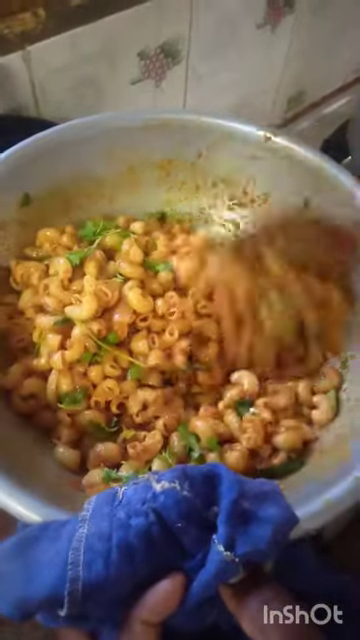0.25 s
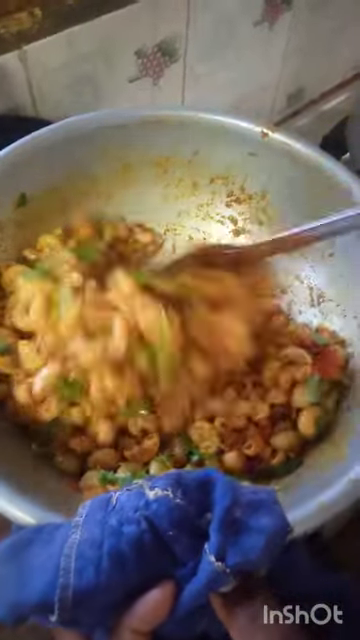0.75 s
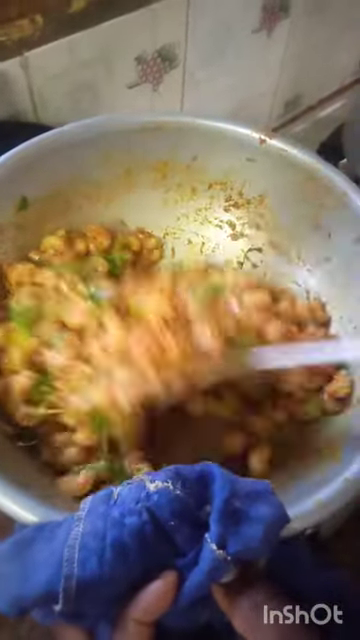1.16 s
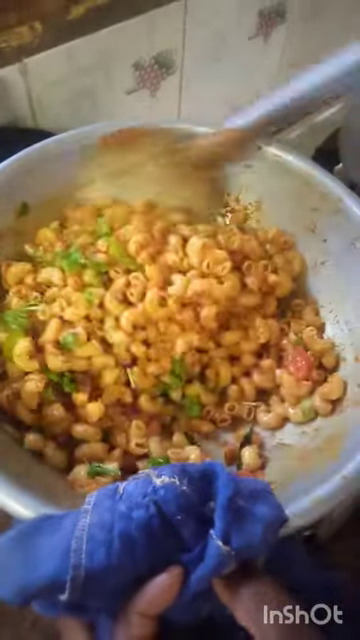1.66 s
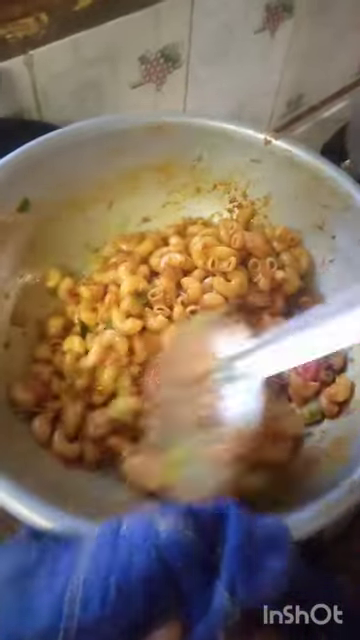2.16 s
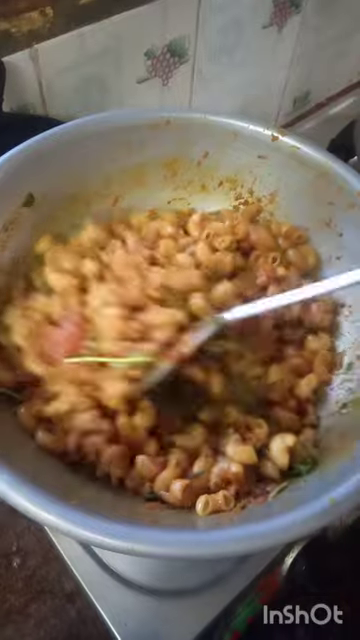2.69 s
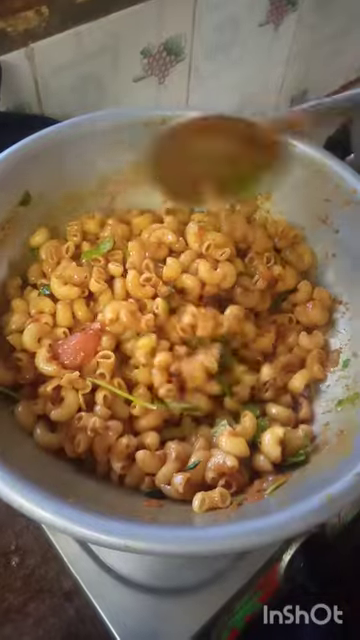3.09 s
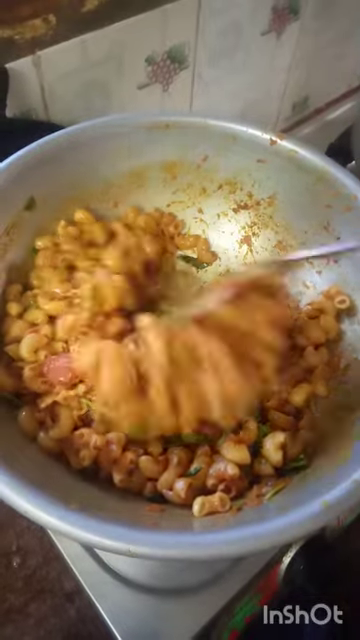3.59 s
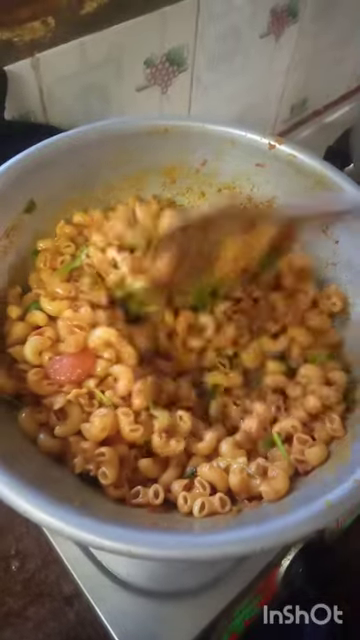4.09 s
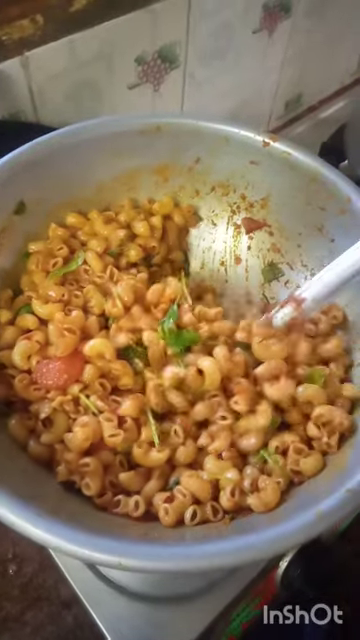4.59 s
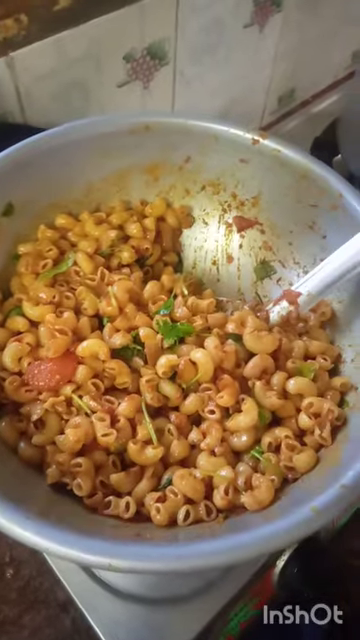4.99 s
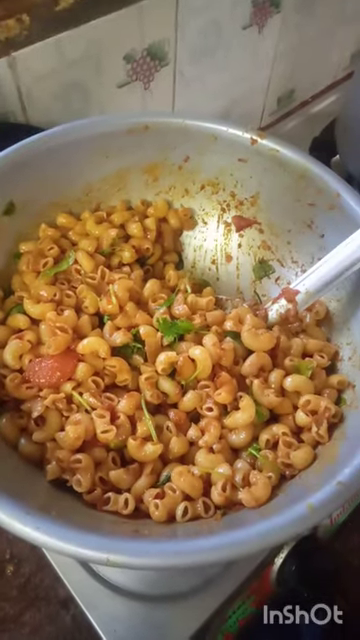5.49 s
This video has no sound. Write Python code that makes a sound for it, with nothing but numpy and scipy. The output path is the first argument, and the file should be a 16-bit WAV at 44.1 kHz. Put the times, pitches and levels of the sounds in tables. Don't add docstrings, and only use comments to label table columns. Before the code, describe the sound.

Close, mono phone pickup in a small kitchen: a spoon clangs twice against a thin pot, rasps through moist pasta and scoops down to bare metal with a sinking groan. Small ticks, snaps and low thuds fill the middle. A sharp slap, a sustained ring and a bright tap come later, then mostly quiet hiss, with faint whistles far outside.

```python
import sys
import numpy as np
from scipy import signal
from scipy.fft import rfft, irfft, next_fast_len
from scipy.io import wavfile
from scipy.ndimage import uniform_filter1d, minimum_filter1d

SR = 44100
rng = np.random.default_rng(int(sys.argv[2]) if len(sys.argv) > 2 else 0)


def invert_db(level):
    return 10 ** (np.asarray(level, dtype=float) / 20)


def file_out(sig):
    cols = np.atleast_2d(sig).T
    lim = np.clip(cols, -1, 1)
    pcm = np.round(lim * 32767).astype(np.int16)
    wavfile.write(sys.argv[1], SR, pcm)


N = 253479

# (frequency [Hz], t60 [s])
POT_MODES = [(226, 0.36), (322, 0.55), (436, 0.28), (464, 0.3), (556, 0.3), (694, 0.52), (830, 0.18),
             (950, 0.075), (1184, 0.6), (1292, 0.18), (1566, 0.55), (1725, 0.45), (2070, 0.32),
             (2150, 0.14), (2568, 0.4), (2614, 0.14), (2660, 0.15), (2985, 0.17), (3047, 0.22),
             (3311, 0.16), (3568, 0.17), (3595, 0.12), (3811, 0.13), (4042, 0.2), (4242, 0.22), (4455, 0.2),
             (5210, 0.12), (5445, 0.12)]
# (time [s], crash level [dB], brightness [dB per octave], crash t60 [factor])
KNOCKS = [
    (.0575, -26.5, -3.5, 2.8),
    (.479, -15, -0.4, 0.85),
    (1.6305, -37, 1.5, 0.85),
    (3.1025, -20.5, 2, 2.15),
    (4.287, -27.5, 0, 2.2),
    (4.628, -36.5, 6, 2.7),
]
# (level [dB] at each of the six knocks, which land on different places)
KNOCK_PLACES = [(-32, -28.5, -44.5, -28.5, -32, -34.5), (-34, -37, -70, -35.5, -44, -43),
                (-27.5, -58, -68, -39, -65, -58), (-31.5, -32, -55.5, -34.5, -68, -47),
                (-31, -32.5, -56, -57, -65, -51), (-31.5, -33.5, -51.5, -31.5, -33.5, -58),
                (-26.5, -33, -47, -40, -39, -52), (-11.5, -42, -31.5, -32, -51, -53),
                (-28, -61, -55, -38.5, -24, -45), (-28.5, -63, -39.5, -53, -30, -55),
                (-41, -28.5, -55, -45, -34, -45), (-32, -52, -57, -34.5, -38, -53),
                (-21.5, -21.5, -31, -26, -36, -35), (-49.5, -25, -40, -31, -27, -28),
                (-28.5, -22.5, -40, -37, -23, -30.5), (-23.5, -10.5, -46, -41, -26, -31),
                (-45.5, -50, -41, -41, -39, -24), (-17, -9, -27, -21, -6, -22.5),
                (-56.5, -51, -49, -50, -39, -35), (-26.5, -15.5, -35, -28, -16, -27),
                (-30.5, -17, -27, -48, -17.5, -39), (-59.5, -37, -51, -25, -27, -19.5),
                (-30, -13, -33, -34, -14, -31), (-29.5, -22, -39, -45, -24, -40),
                (-51, -23.5, -50, -51, -32, -46), (-37, -28, -52, -53, -32.5, -42),
                (-63, -28, -44, -31, -60, -33), (-34, -22, -44, -38, -34, -43)]
KNOCK_DAMPING = [1.02, 1.67, 0.93, 0.79, 0.93, 1.57]
KNOCK_DAMPING_TILT = [0.0, 0.0063, 0, 0.12, 0.09, 0.058]
KNOCK_RINGS_FOR = [.4, .4, .4, .4, .27, .3]
# (frequency [Hz], level [dB per Hz])
CRASH_SPECTRUM = [(70, -27.5), (120, -24), (250, -1), (700, -3.5), (1400, -4.5), (2200, 0), (3500, -19),
                  (4500, -12.5), (6200, -9.5), (8000, -4.5), (9800, -19), (11500, -19), (14500, -21),
                  (16400, -6.5)]
# (frequency [Hz], t60 [s])
CRASH_T60 = [(150, 0.21), (600, 0.17), (2000, 0.13), (5000, 0.14), (8000, 0.2), (15000, 0.085)]
# (time [s], peak level [dB], centre [Hz], t60 [s])
CRACKS = [
    (.4808, -8, 7900, .016),
    (.4812, -7, 2700, .03),
    (3.1035, -14, 5250, .03),
    (3.1215, -15, 750, .025),
    (3.132, -14, 850, .03),
    (.2172, -33, 11000, .03),
    (2.5105, -43, 2300, .08),
    (4.0275, -37, 500, .08),
    (4.5055, -28, 2200, .04),
]
# (start [s], length [s], pressure [dB], depth in the pasta [dB], grit [dB])
STROKES = [(0.074, 0.16, -36.5, -5, 5), (0.496, 0.082, -27.5, -5, 0), (0.706, 0.042, -42.5, -7, -6),
           (0.857, 0.12, -50, -15, -8), (0.991, 0.35, -42.5, -4.5, -16), (1.136, 0.12, -33, -5.5, 3.5),
           (1.364, 0.11, -50.5, -13, 1.5), (1.645, 0.056, -32, -17.5, -0.5), (1.737, 0.21, -38, -2, 1),
           (1.945, 0.14, -38, -3, -1), (2.027, 0.023, -32.5, -28, -6), (2.217, 0.032, -45.5, 1.5, -29),
           (2.31, .15, -58, -23, 1), (2.503, 0.098, -46, -10.5, -9), (2.575, 0.11, -45, -6.5, -3.5),
           (2.672, 0.27, -49, -13.5, -1.5), (3.101, 0.071, -32, 2.5, 5), (3.227, 0.13, -37.5, -10, -11),
           (3.421, 0.12, -47.5, 8, -9), (3.916, 0.16, -45, -25, -4), (4.022, 0.028, -48, 5, -12),
           (4.093, 0.049, -46.5, 1, -5), (4.502, 0.058, -32.5, 1, -6.5), (4.629, 0.1, -37, 0, -3)]
# (frequency [Hz], level [dB per Hz])
RASP_SPECTRUM = [(47, -57), (80, -10.5), (249, 12.5), (465, -3.5), (759, 0.5), (1420, -7.5), (2110, -7.5),
                 (2310, -11), (3020, -6.5), (4710, -25.5), (5900, -27), (7700, -20), (11500, -42.5),
                 (14700, -35), (16400, -44.5)]
SLIDING_DB = [-14, -13, -12, -11, -12, -12, -10, -10, -17, -18, -17, -16, -10, -12, -8, -8, -8, 1, -10, -9,
              -7, -8, -8, -8, -14, -14, -22, -24]
# (time [s], level [dB], frequency [Hz])
SCOOP = [
    (1.14, -29, 830),
    (1.156, -28.5, 754),
    (1.185, -27, 597),
    (1.205, -29.5, 514),
    (1.245, -32, 490),
    (1.278, -33, 420),
    (1.346, -43.5, 430),
    (1.42, -65, 440),
]
# (frequency [Hz], width [Hz], level [dB])
SCOOP_RINGS = [(311.3, 8.2, 3.5), (459, 26, -1), (528, 19, -4.5), (585, 20, -13), (668, 32, -11.5),
               (800, 33, -8.5), (870, 25, -18), (1010, 21, -23)]
# (time [s], level [dB], frequency [Hz])
GRIT_SQUEAL = [
    (0.58, -47, 2480),
    (0.61, -31.5, 2500),
    (0.654, -29, 2170),
    (0.68, -37, 2140),
    (0.76, -60, 2290),
]
# (time
# [s], peak level [dB], frequency [Hz], t60 [s], rise [s])
PINGS = [(0.0582, -8, 889, 0.051, 0.00098), (.0605, -11, 734, 0.028, .002),
         (0.2153, -18.5, 8280, 0.026, 0.0025), (.229, -35, 8150, .04, .003), (.238, -34, 8300, .06, .003),
         (1.14, -29, 885, .1, 0.0016), (1.153, -27.5, 644, 0.17, 0.0033), (1.157, -27, 963, 0.086, 0.0031),
         (1.18, -26, 694, .07, 0.0024), (1.193, -22, 554, 0.069, 0.005),
         (1.201, -17.5, 464.6, 0.15, 0.0068), (1.226, -25, 627, 0.051, .003),
         (1.235, -25, 472, 0.14, 0.0033), (1.246, -26.5, 322.3, 0.47, 0.0058),
         (1.256, -19, 490, 0.056, 0.0043), (1.25, -27, 674, 0.13, 0.0036), (1.265, -33, 765, 0.17, 0.0066),
         (1.28, -26, 560, .12, 0.0034), (1.195, -37, 1534, 0.091, 0.0066), (1.305, -32, 222, 0.11, .01),
         (1.385, -39, 319, 0.22, 0.011), (1.631, -32, 5210, .04, .001), (1.646, -24, 964, 0.057, 0.0021),
         (1.662, -38, 5370, .06, .003), (1.68, -36, 5420, .08, .003), (1.71, -28, 2070, .1, .008),
         (1.972, -36, 2600, 0.18, 0.0011), (2.032, -31, 2985, 0.18, .002), (2.09, -38, 2600, 0.13, .003),
         (3.105, -25, 990, 0.047, 0.0017), (3.124, -24, 5320, .03, .002), (3.23, -30.5, 2140, 0.11, 0.0055),
         (3.24, -38, 4050, 0.16, .01), (3.285, -31, 3250, 0.037, .003), (3.394, -33, 1865, .05, .004),
         (3.478, -42, 3250, 0.045, 0.0033), (4.629, -25, 1034, 0.058, 0.0018),
         (4.298, -19, 698.6, 0.17, 0.019), (4.315, -37, 5460, .04, .005), (4.51, -36.5, 1736, 0.36, .004),
         (4.33, -36, 1567, .9, .04),
    (4.33, -39, 1722, .9, .05),
    (.15, -36, 1740, .4, .03),
    (3.1027, -5, 800, .024, .0008),
    (3.1034, -4, 7900, .018, .0006),
    (3.1037, -10, 7100, .014, .0006),
    (3.103, -12, 3450, .05, .0006),
    (3.116, -25, 8100, .06, .002),
    (3.142, -24, 8000, .1, .004),
    (3.163, -25, 7900, .07, .004),
]
# (time [s], peak level [dB], centre [Hz], t60 [s], ring of the wall [dB])
TICKS = [(0.217, -35.5, 2980, 0.08, 5), (0.701, -35, 2100, 0.11, -4), (1.065, -37, 2580, 0.089, -15),
         (1.681, -30, 3010, 0.065, -18), (1.7487, -43, 2990, 0.1, -6), (1.758, -30.5, 2986, 0.26, -21),
         (1.7841, -29, 2770, 0.1, -6), (1.93, -37, 3540, 0.082, -15), (1.9705, -34, 2600, 0.11, -9),
         (2.011, -43, 3270, 0.073, -2), (2.034, -37, 3000, 0.072, 2.5), (2.0388, -30.5, 3010, 0.11, 5),
         (2.067, -31, 1230, 0.056, -8), (2.5101, -54, 2570, 0.054, -12), (3.2868, -31, 3350, 0.04, -28),
         (3.322, -32.5, 4030, 0.051, -22), (3.339, -31.5, 3160, 0.08, 2), (3.3793, -29, 1830, 0.1, -12),
         (3.3945, -28, 1880, 0.11, -8), (3.4286, -30, 1860, 0.071, -8), (3.44, -28.5, 2050, 0.062, -8),
         (3.456, -35, 1810, 0.037, -27), (3.4717, -31.5, 1790, 0.068, -26), (4.139, -40, 3120, 0.06, -8),
         (4.505, -34.5, 1740, 0.15, 5.5), (4.5264, -22, 3000, 0.053, -14), (4.587, -32, 3400, 0.068, -4),
         (4.659, -25.5, 2634, 0.11, -6)]
# (time [s], peak level [dB], centre [Hz], t60 [s])
THUDS = [(0.729, -36, 243.6, 0.41), (1.0, -33.5, 259, 0.16), (2.205, -31.5, 249, 0.27),
         (3.35, -31, 264, 0.22), (3.429, -32, 265, 0.31), (3.48, -31, 283, 0.1), (3.493, -26.5, 282, 0.11),
         (3.508, -31.5, 247, 0.079), (4.03, -29, 240, 0.5), (4.503, -33, 810, 0.1), (4.545, -32, 244, 0.19),
         (4.674, -29.5, 235, 0.18), (2.062, -29, 902, 0.19), (5.572, -40, 739, 0.26)]
# (time [s], peak level [dB], centre [Hz], t60 [s])
SNAPS = [(.088, -36, 7600, 0.053), (0.1014, -30, 8000, 0.29), (.101, -34, 10000, 0.14),
         (0.2176, -33, 8430, 0.35), (1.14, -47, 870, 0.039), (1.269, -26, 3380, 0.17),
         (1.18, -27, 3700, 0.24), (2.511, -56, 2640, 0.044), (4.029, -48, 910, 0.045),
         (1.632, -35, 972, 0.53), (4.629, -21, 1010, 0.071), (1.668, -37, 10300, .06),
         (1.747, -33, 7750, 0.59), (1.97, -28, 7200, 0.11), (3.537, -59, 12500, 0.016),
         (3.6275, -61, 13000, .02), (3.68, -57, 12500, 0.026), (3.9009, -48, 12900, 0.037),
         (3.9174, -50, 12600, .03), (4.505, -43, 6900, 0.094)]
# (frequency [Hz], t60 [s])
KITCHEN_T60 = [(200, 0.77), (1000, 0.49), (4000, 0.54), (12000, 0.24)]
# (time [s], length [s], start [Hz], end [Hz],
# width [Hz], level [dB])
FAR_TONES = [
    (1.0, .095, 3700, 5500, 120, -61),
    (1.43, .18, 1750, 1700, 60, -55),
    (2.318, .08, 3550, 5200, 120, -62),
    (3.45, .07, 4300, 5400, 120, -61),
    (3.7, .32, 150, 148, 14, -61),
    (4.6, .24, 72, 64, 25, -56),
    (4.2, .25, 120, 105, 30, -58),
    (3.2, .3, 85, 72, 30, -62),
]
# (frequency [Hz], level [dB per Hz])
ROOM_SPECTRUM = [(30, -31.5), (60, -11), (100, -1), (140, 1), (200, -7.5), (500, -11), (1300, -8),
                 (2700, -3), (4000, -10), (5600, -22.5), (7600, -9.5), (9500, -23), (11500, -26),
                 (14500, -22.5)]
# (time [s], level [dB])
ROOM_DRIFT = [(0, 5.5), (.9, 4.5), (1.5, 7.5), (2.4, 2.5), (3, 2.5), (3.8, 3.5), (5.1, 2.5), (5.75, 2)]

ROOM_DB = -57
GRIP_S, SAG_DB_PER_S = 0.0069, 13
LIFT_DB_PER_S = [145, 173, 168]
WALL_SHARE, BARE_SHARE = 0.11, 0.65
BARE_FROM_S, BARE_TO_S = 1.63, 2.16
WAVER_DB, WAVER_PER_S = 1.7, 45


def evened(x):
    return x / np.sqrt(np.mean(x ** 2) + 1e-20)


def read(points, hz):
    f, value = np.transpose(points)
    return np.interp(np.log(hz + 1), np.log(f + 1), value)


def add(mix, s, sound):
    part = mix[round(s * SR):][:len(sound)]
    part += sound[:len(part)]


def colour(x, points, lo_hz=0, hi_hz=SR):
    size = next_fast_len(len(x), True)
    hz = np.fft.rfftfreq(size, 1 / SR) + 1
    edges = 1 / np.sqrt((1 + (lo_hz / hz) ** 12) * (1 + (hz / hi_hz) ** 12))
    shaped = rfft(x, size) * invert_db(read(points, hz)) * edges
    return evened(irfft(shaped, size)[:len(x)])


def resonate(x, hz, width):
    turn = np.exp(2j * np.pi * np.cumsum(hz * np.ones(len(x))) / SR)
    r = np.exp(-np.pi * width / SR)
    return 2 * (turn * signal.lfilter([1 - r], [1, -r], x / turn)).real


def dying(x, t60s, factor=1):
    hz, t, z = signal.stft(x, SR, nperseg=256)
    t60 = factor * read(t60s, hz)[:, None]
    return signal.istft(z * invert_db(-60 * t / t60), SR, nperseg=256)[1][:len(x)]


def modes(damping, seconds, tilt=0):
    t = np.arange(round(seconds * SR))[:, None] / SR
    hz, t60 = np.transpose(POT_MODES)
    t60 = t60 / (hz / 2000) ** tilt
    decay = np.log(1000) * damping / t60
    main = np.exp((2j * np.pi * hz - decay) * t)
    twin = invert_db(-18) * np.exp((-2j * np.pi * .007 * hz + .55 * decay) * t)
    return main * (1 + twin)


def ringing(turns, levels_db, scatter=1):
    phase = 2 * np.pi * scatter * (rng.random(len(POT_MODES)) - .5)
    return (turns @ (invert_db(levels_db) * np.exp(1j * phase))).imag


def wavering(t):
    steps = np.arange(0, t[-1] + 2 / WAVER_PER_S, 1 / WAVER_PER_S)
    growth = np.minimum(10 * steps, 1.5)[:, None]
    chance_db = WAVER_DB * rng.standard_normal((len(steps), len(POT_MODES))) * growth
    return invert_db(np.transpose([np.interp(t, steps, column) for column in chance_db.T]))


def knock(place, db, tilt_db, factor):
    seconds = KNOCK_RINGS_FOR[place]
    t = np.arange(round(seconds * SR)) / SR
    shape = [(hz, level + tilt_db * np.log2(hz / 2000)) for hz, level in CRASH_SPECTRUM]
    crash = dying(colour(rng.standard_normal(len(t)), shape), CRASH_T60, factor)
    contact = 1 + 4.3 * np.exp(-t / 0.0022)
    turns = modes(KNOCK_DAMPING[place], seconds, KNOCK_DAMPING_TILT[place]) * wavering(t)
    ring = ringing(turns, np.transpose(KNOCK_PLACES)[place], scatter=.3)
    fade = np.minimum(t / .001, 1) * np.minimum((t[-1] - t) / .04, 1)
    return (ring + invert_db(db) * contact * crash) * fade


def stroke(t, start, length, rasp_db, depth_db, grit_db):
    since = np.maximum(t - start, 0)
    layers_db = np.array([[depth_db], [0], [grit_db]])
    level_db = rasp_db - 7.0 + layers_db - SAG_DB_PER_S * np.minimum(since, length)
    lift_db = np.outer(LIFT_DB_PER_S, np.maximum(since - length, 0))
    return np.minimum(since / GRIP_S, 1) * invert_db(level_db - lift_db)


def slips(per_s, spread_db):
    strength = invert_db(spread_db * np.minimum(rng.exponential(1, N), 3))
    grabs = strength * (rng.random(N) < per_s / SR)
    return rng.standard_normal(N) * (1.4 + signal.lfilter([1], [1, -.99], grabs))


def clumped(x, depth_db):
    z = signal.stft(x, SR, nperseg=256)[2]
    patches = uniform_filter1d(rng.standard_normal(z.shape[::-1]), size=5, axis=0)
    patches = evened(uniform_filter1d(patches, size=5, axis=1))
    return evened(signal.istft(z * invert_db(depth_db * patches.T), SR, nperseg=256)[1][:len(x)])


def stirring(turns):
    t = np.arange(N) / SR
    steps = np.arange(0, N / SR + .01, .002)
    control = np.sqrt(sum(stroke(steps, *row) ** 2 for row in STROKES))
    rumble, rasp, hiss = [np.interp(t, steps, layer) for layer in control]
    bare = (t > BARE_FROM_S) & (t < BARE_TO_S)
    share = np.where(bare, BARE_SHARE, WALL_SHARE)
    drive = clumped(slips(per_s=300, spread_db=2.2), depth_db=2.2)

    wall = ringing(turns, SLIDING_DB)
    wall /= np.linalg.norm(wall)
    flat = [(100, 0), (16000, 0)]
    low, mid = colour(drive, flat, 150, 1200), colour(drive, flat, 1200, 4800)
    low_scale, mid_scale = [np.std(signal.oaconvolve(v, wall)) for v in (low, mid)]
    push = np.sqrt(share) * (rumble * low / low_scale + rasp * mid / mid_scale)
    sung = signal.oaconvolve(push, wall)[:N]

    direct = rumble * colour(drive, RASP_SPECTRUM, 0, 1200)
    direct += rasp * colour(drive, RASP_SPECTRUM, 1200, 4800)
    return 1.4 * sung + np.sqrt(1 - share) * direct + hiss * colour(drive, RASP_SPECTRUM, 4800)


def glide(rows, narrow, wide):
    s, level_db, centre_hz = np.transpose(rows)
    t = np.arange(s[0], s[-1] + 0.3, 1 / SR)
    hz = np.interp(t, s, centre_hz)
    tone = resonate(rng.standard_normal(len(t)), hz, narrow)
    tone = evened(resonate(tone, hz, wide))
    level = invert_db(np.interp(t, s, level_db, right=-99) - 4.0)
    return tone * level * np.minimum((t - s[0]) / 0.0012, 1)


def scoop():
    tone = glide(SCOOP, 400, 710)
    return .6 * tone + sum(invert_db(db + 11) * resonate(tone, hz, width) for hz, width, db in SCOOP_RINGS)


def ping(db, hz, t60, rise_s):
    t = np.arange(round(.25 * SR)) / SR
    drift = 1 + .004 * evened(uniform_filter1d(rng.standard_normal(len(t)), size=300))
    rise = np.sin(np.pi / 2 * np.minimum(t / max(rise_s, 1e-4), 1)) ** 2
    fade = np.minimum((t[-1] - t) / 0.044, 1)
    tone = np.sin(2 * np.pi * np.cumsum(hz * drift) / SR)
    return invert_db(db - 60 * t / max(t60, .01)) * rise * fade * tone


def bump(db, hz, t60, spread, clear=0):
    t = np.arange(round(.25 * SR)) / SR
    shake = rng.standard_normal(len(t))
    pure = np.sqrt(2) * np.sin(2 * np.pi * hz * t)
    ring = clear * pure + (1 - clear) * evened(resonate(shake, hz, spread * hz))
    body = .8 * ring + .55 * colour(shake, RASP_SPECTRUM, lo_hz=.75 * hz)
    return invert_db(db - 5.0 - 60 * t / max(t60, .01)) * body * np.minimum(t * hz / 0.5, 1)


def tick(turns, db, hz, t60, ring_db):
    wall = ringing(turns, np.array(SLIDING_DB) + 4 * rng.standard_normal(len(POT_MODES)))
    return wall * invert_db(db + ring_db) / abs(wall).max() + bump(db, hz, t60, spread=0.045, clear=.6)


def kitchen(x):
    taps = np.zeros(SR // 2)
    at = np.arange(200, len(taps) - 20, 20)
    taps[at + rng.integers(0, 20, len(at))] = rng.choice([-1., 1.], len(at))
    tail = dying(taps, KITCHEN_T60)
    return signal.fftconvolve(x, tail / np.linalg.norm(tail))[:N]


def far_tone(length, start_hz, end_hz, width, db):
    n = round(length * SR)
    hz = start_hz + (end_hz - start_hz) * np.linspace(0, 1, n) ** .8
    fuzz = evened(resonate(rng.standard_normal(n), hz, width))
    tone = 1.2 * np.sin(2 * np.pi * np.cumsum(hz) / SR) + .5 * fuzz
    return invert_db(db) * tone * signal.windows.tukey(n, .4) * np.linspace(1, .35, n)


def room_tone():
    s, drift_db = np.transpose(ROOM_DRIFT)
    level = invert_db(ROOM_DB + np.interp(np.arange(N) / SR, s, drift_db))
    return level * colour(rng.standard_normal(N), ROOM_SPECTRUM)


def scene():
    muffled = modes(damping=1.7, seconds=.25)
    pot = stirring(muffled)
    for place, (s, *blow) in enumerate(KNOCKS):
        add(pot, s, knock(place, *blow))
    for s, *crack in CRACKS:
        add(pot, s, bump(*crack, spread=.08, clear=.7))
    add(pot, SCOOP[0][0], scoop())
    add(pot, GRIT_SQUEAL[0][0], glide(GRIT_SQUEAL, 500, 900))
    for s, *catch in PINGS:
        add(pot, s, ping(*catch))
    for s, *touch in TICKS:
        add(pot, s, tick(muffled, *touch))
    for s, *thud in THUDS:
        add(pot, s, bump(*thud, spread=0.17, clear=0.44))
    for s, *snap in SNAPS:
        add(pot, s, bump(*snap, spread=0.043, clear=0.27))
    pot = signal.sosfilt(signal.butter(2, 100, "high", fs=SR, output="sos"), pot)

    far = room_tone()
    for s, *call in FAR_TONES:
        add(far, s, far_tone(*call))
    return np.tile(pot + invert_db(-14) * kitchen(pot) + far, (2, 1))


def top_cut(x):
    return signal.sosfilt(signal.butter(12, 16650, fs=SR, output="sos"), x)


def record(dry):
    x = signal.sosfilt(signal.butter(2, 60, "high", fs=SR, output="sos"), dry)
    crest = -minimum_filter1d(-abs(x), 133, axis=1)
    x = x / uniform_filter1d(np.maximum(crest / .56, 1), 89, axis=1)
    band = signal.firwin(301, 15550, window=("kaiser", 6), fs=SR)
    mix = signal.oaconvolve(x, band[None], "same")
    return top_cut(mix)


dry = scene()
out = record(dry)
file_out(out)
```